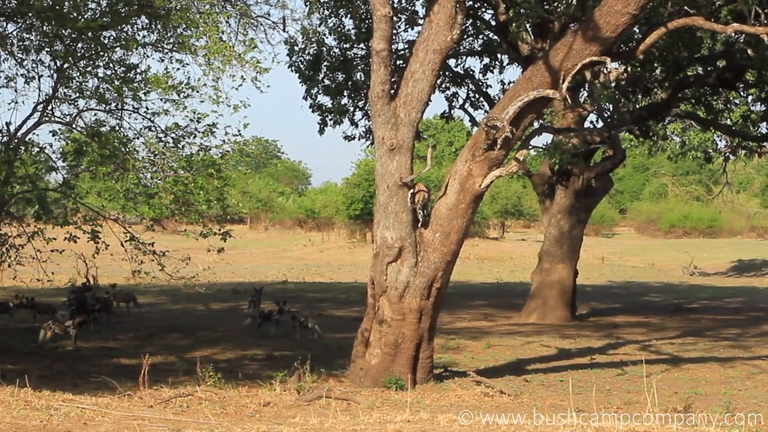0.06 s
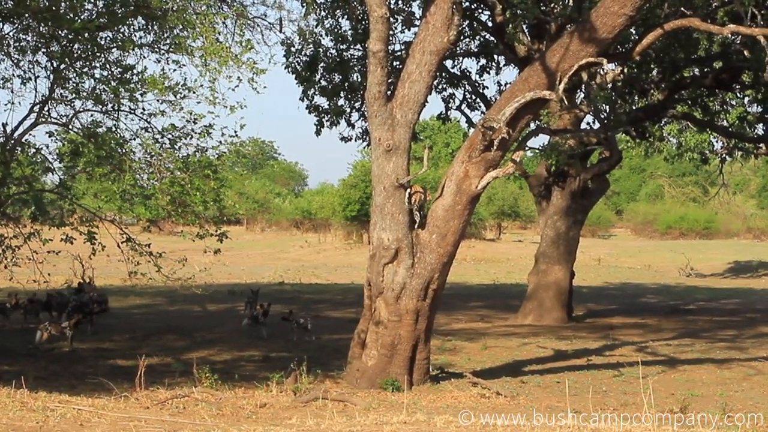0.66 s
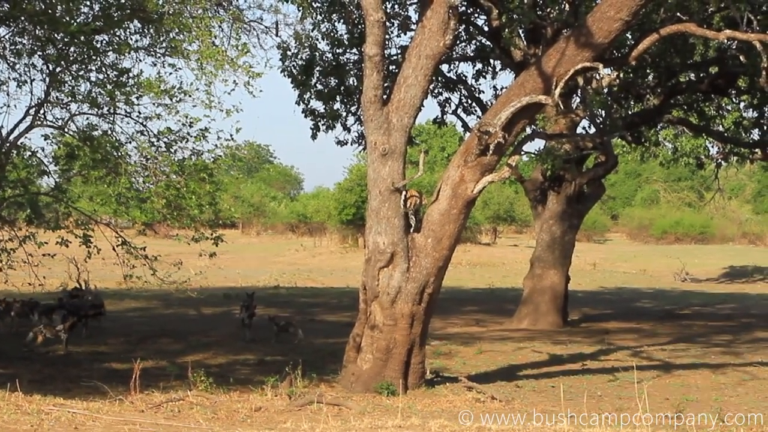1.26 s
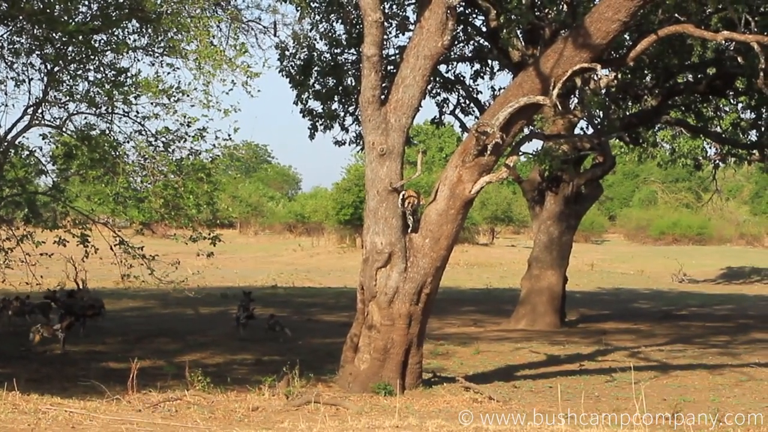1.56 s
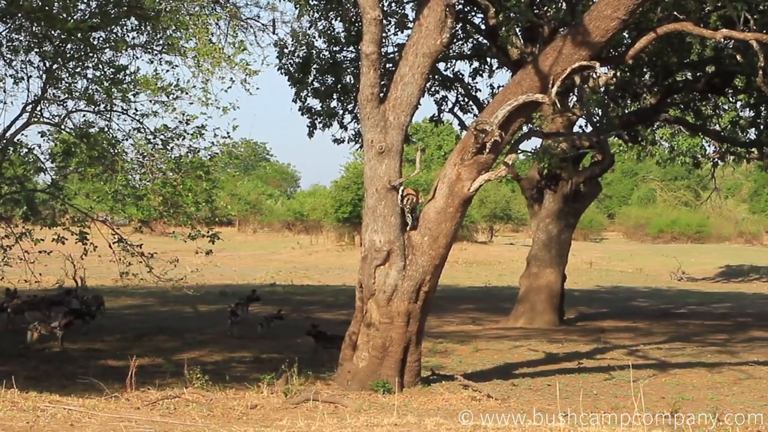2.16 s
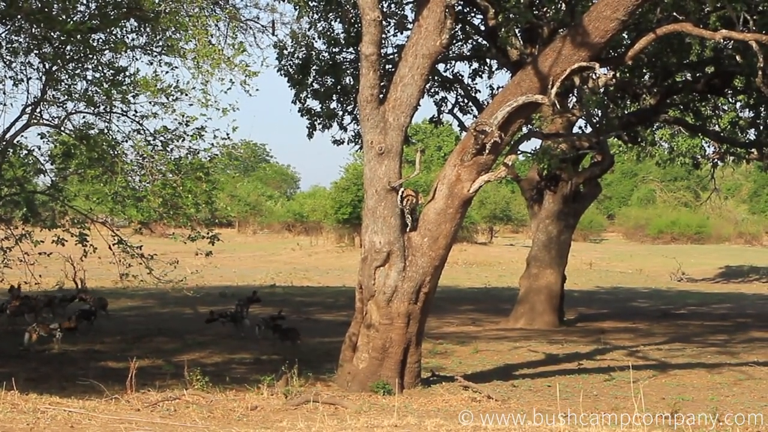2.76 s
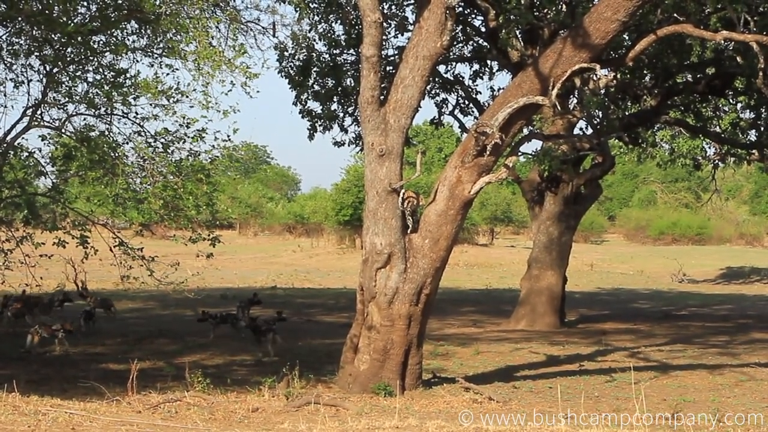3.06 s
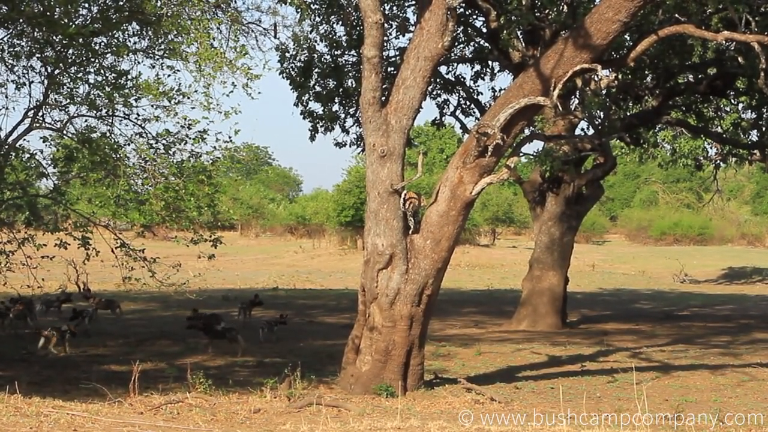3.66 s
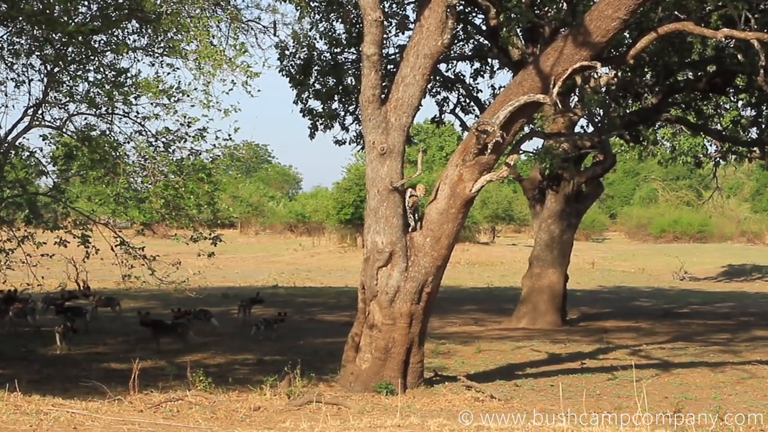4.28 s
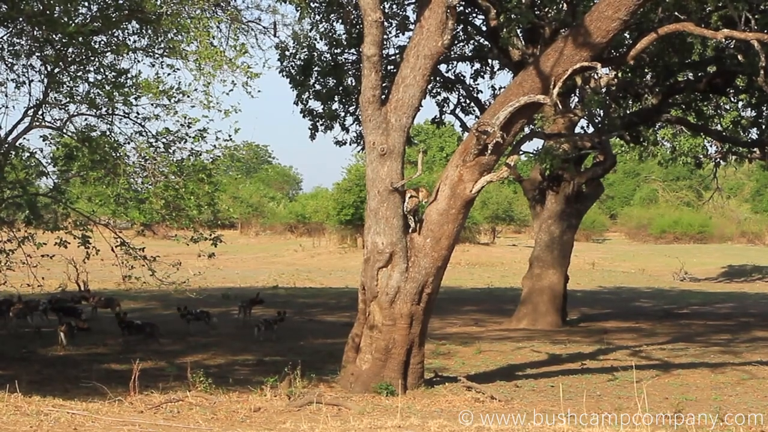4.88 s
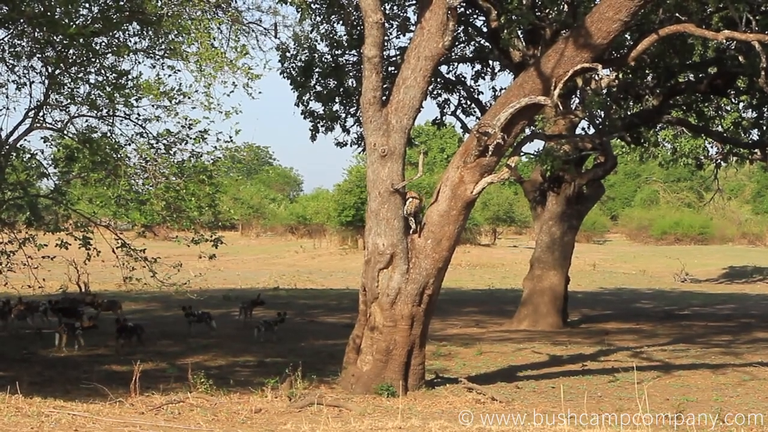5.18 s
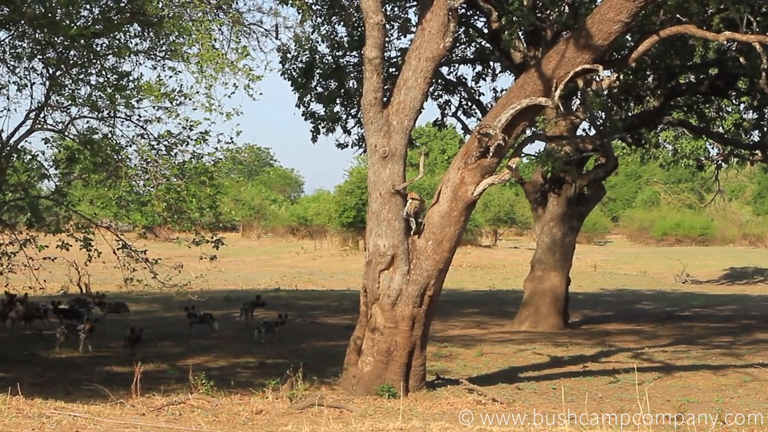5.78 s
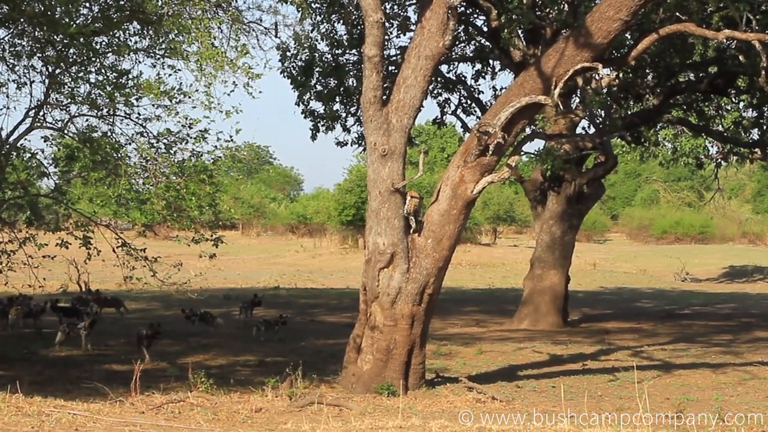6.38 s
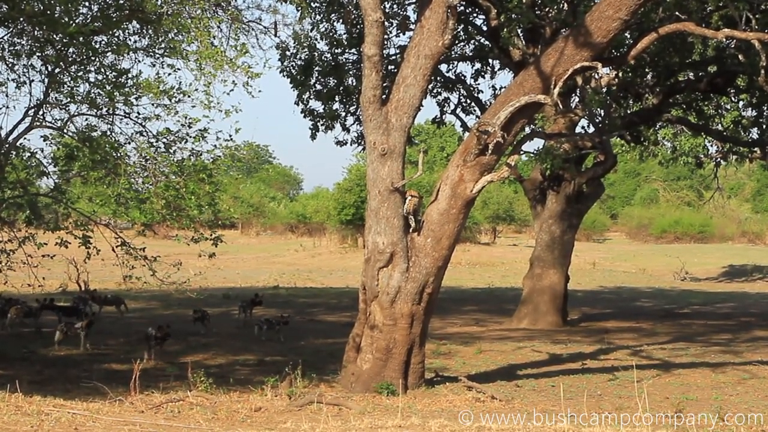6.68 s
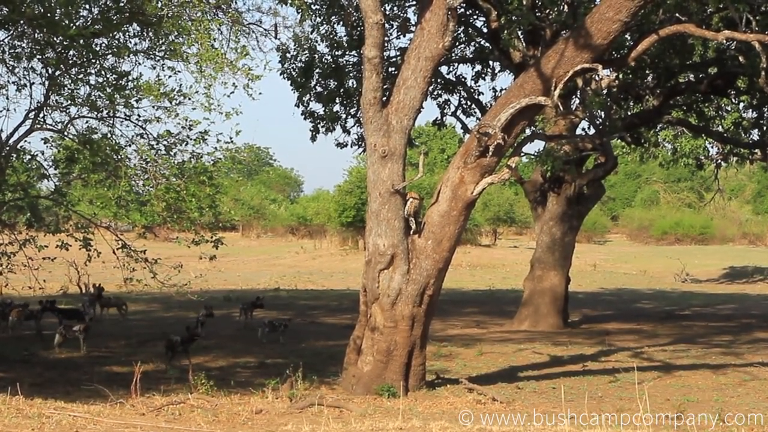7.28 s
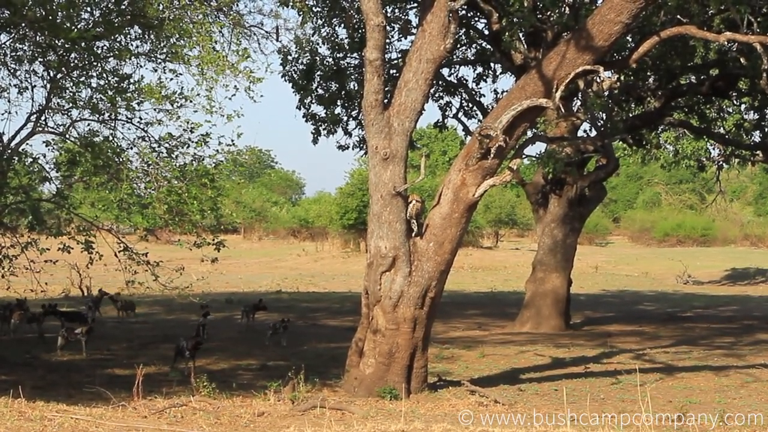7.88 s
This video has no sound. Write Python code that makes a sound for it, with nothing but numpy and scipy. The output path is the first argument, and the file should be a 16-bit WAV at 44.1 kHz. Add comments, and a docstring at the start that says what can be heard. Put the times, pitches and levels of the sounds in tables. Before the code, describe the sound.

A pack of wild dogs twitters on a dry, open plain. Four short, throaty yaps come first, each joined to a thin, very high warbling whistle. A lull follows, with faint squeaks and distant birds. Then the calls return louder, about two a second, mixed with tiny chirps, paws rustling in dry litter and soft clacks, ending on a creaky yap. Nearby trees add a short echo over quiet air and hissing leaves.

```python
"""A pack of wild dogs twitters in the shade of big trees on a dry plain.
Each call layers two voices: a short, throaty yap and a thin whistle that leaps, drops and warbles away.
Breathy rasp sits under the calls, squeaks and chirps answer them, and the last yap creaks.
Paws rustle in dry litter among soft clacks and one dull bump; trunks and foliage scatter the calls.
Far birds sing over a quiet bed of open air and hissing leaves."""
import sys
import numpy as np
from scipy import signal
from scipy.fft import rfft, irfft, next_fast_len
from scipy.io import wavfile
from scipy.ndimage import uniform_filter1d, map_coordinates

SR = 44100
rng = np.random.default_rng(int(sys.argv[2]) if len(sys.argv) > 2 else 0)


def file_out(sig):
    """Save sig as 16-bit WAV at sys.argv[1]."""
    # one column per channel
    cols = np.atleast_2d(sig).T
    # limit, then scale
    lim = np.clip(cols, -1, 1)
    pcm = np.round(lim * 32767).astype(np.int16)
    wavfile.write(sys.argv[1], SR, pcm)


N = 350154
TIME = np.arange(N) / SR

# Levels in the tables are relative: each layer's own gain and EQ come on top.
# high voice, one row a call:
# (dip pitch [Hz], top pitch [Hz], hold [s], lead-in level [dB], leap level [dB], hold level [dB])
WHISTLES = [(6110, 14700, .085, -33.5, -34, -38), (5930, 14800, 0.057, -38, -34, -34),
            (6700, 14400, 0.051, -56, -42, -41.5), (7800, 14400, .04, -50, -46.5, -42),
            (8800, 15000, .061, -39, -29, -19), (6500, 14400, .051, -24, -25, -17.5),
            (6820, 12400, .053, -31, -28, -23.5), (5740, 16300, 0.04, -20.5, -34, -20.5),
            (6440, 20000, .01, -27, -31, -24), (6210, 15200, 0.015, -28.5, -32, -36)]
# tail of each whistle: (length [s], period [s], climb time [s], depth [0-1], level [dB])
WARBLES = [(0.062, 0.024, .04, 0.7, -41), (0.1, 0.023, 0.03, 0.4, -46), (0.044, 0.04, .3, 0.49, -52.5),
           (0.066, 0.041, 0.076, 0.8, -47.5), (0.076, .03, 0.015, .3, -26), (.1, .0345, 0.016, .8, -25.5),
           (0.069, 0.045, 0.11, .25, -33), (.112, 0.019, 0.049, 0.7, -29), (0.1, 0.028, 0.012, .8, -30),
           (0.16, 0.026, 0.096, 0.7, -33)]
# low voice of the same calls: (time [s], length [s], start pitch [Hz], top pitch [Hz], end pitch [Hz],
# level [dB], overtone gain [dB], sag level [dB], rasp level [dB])
YAPS = [(0.123, 0.024, 1348, 1554, 1200, -38.5, 4.5, -48, -43.5),
        (0.567, .037, 1358, 1857, 1830, -29, -10.5, -44, -43),
        (1.036, .038, 1160, 1263, 1060, -43, -3, -48, -46.5),
        (1.422, 0.039, 1797, 1867, 1780, -40.5, -2, -77, -58),
        (5.229, 0.029, 1555, 1555, 1310, -30.5, 10.5, -63, -43),
        (5.711, 0.024, 1543, 1500, 1090, -27.5, 6.5, -65, -42.5),
        (6.192, .021, 1446, 1386, 1100, -33, 5.5, -49, -40.5),
        (6.652, .028, 1345, 1675, 1480, -21.5, -0.5, -46, -39.5),
        (7.124, 0.035, 1412, 1618, 1460, -23.5, 0.5, -33.5, -39.5),
        (7.593, 0.027, 1350, 1598, 1290, -26.5, 1, -44, -40.5)]
# throat resonances: (frequency [Hz], gain [dB])
THROAT_EQ = [(1100, 8.5), (1500, 0), (1900, -3), (2400, 2.5), (2900, -9), (3200, 1), (3700, -3),
             (4200, -9.5), (4700, -8.5), (5400, -11.5), (6300, -28.5), (11000, -38)]
# contour of the last, creaky yap: (time [s], pitch [Hz], level [dB])
CREAK_CONTOUR = [(7.772, 341.5, -52), (7.781, 362.6, -34), (7.79, 365, -32.5), (7.805, 356.5, -33.5),
                 (7.813, 355, -43)]
# its buzzy timbre: (harmonic [number], level [dB])
CREAK_PARTIALS = [(1, -23), (2, -15), (3, 2.5), (4, -13), (5, -7), (6, -0.5), (7, -9), (8, 2.5), (9, -1),
                  (10, -18), (11, -1.5), (12, -12), (14, -8)]
# colour of the throat noise: (frequency [Hz], gain [dB])
RASP_EQ = [(300, -46), (740, -12), (950, -7), (1350, 2.5), (1950, -3.5), (2900, 2), (4200, -10),
           (5800, -0.5), (7600, -16), (11000, -14.5), (16000, -22)]
# the pack's squeaks and whines:
# (time [s], length [s], start pitch [Hz], middle pitch [Hz], end pitch [Hz], level [dB])
SQUEAKS = [(.344, 0.018, 5660, 4410, 4600, -36.5), (1.56, 0.063, 10600, 12700, 8550, -50),
           (1.635, 0.046, 8400, 9800, 11300, -45), (1.69, 0.052, 11200, 10100, 6000, -47),
           (1.75, 0.045, 5400, 5130, 6000, -49.5), (1.9, 0.102, 777, 847, 750, -51),
           (1.985, 0.067, 10600, 13150, 12000, -49), (2.075, .06, 9200, 9520, 8800, -47.5),
           (2.5, 0.076, 11900, 11800, 12100, -52), (2.745, .017, 11000, 9100, 9100, -50.5),
           (2.9, 0.073, 6900, 6160, 5760, -60), (2.955, 0.026, 6100, 5430, 6300, -40),
           (4.255, .08, 11500, 14700, 13600, -58), (4.348, 0.025, 12500, 10100, 9000, -53.5),
           (5.082, .024, 9700, 13400, 15300, -49), (5.984, 0.016, 6160, 5520, 5800, -37.5),
           (5.995, .042, 9300, 9100, 8700, -53), (7.757, 0.011, 5300, 5680, 5800, -20)]
# spells of thin chirping: (start [s], end [s], level [dB])
CHATTER_SPELLS = [(0.702, .98, -70), (3.002, 3.2, -63), (3.868, 4.026, -59), (5.427, 5.66, -53),
                  (6.043, 6.17, -52), (6.405, 6.595, -51), (6.976, 7.11, -50), (7.414, 7.52, -58)]
# foreground clacks: (time [s], level [dB], hollow knock gain [dB])
CLACKS = [(4.972, -32.5, -1), (5.134, -36, -6), (5.465, -23, -5), (5.495, -28, 3), (5.603, -32.5, -22),
          (6.414, -24.5, 0.5), (6.447, -23, -30), (6.886, -29.5, -2.5), (6.918, -28.5, -3.5),
          (7.363, -33.5, 0.5), (7.392, -31, -21)]
# colour of a clack's snap: (frequency [Hz], gain [dB])
SNAP_EQ = [(200, -5), (1000, -12.5), (1700, -19), (2800, 0), (4300, -10.5), (6000, -16), (15000, -35)]
# spells of paws in litter: (start [s], end [s], level [dB])
SCUFFLE_SPELLS = [(0.798, 0.988, -53), (4.752, 5.227, -63.5), (5.439, 5.668, -51.5), (5.931, 6.157, -53.5),
                  (6.393, 6.62, -54), (6.863, 7.11, -53.5), (7.339, 7.517, -53)]
# colour of the dry litter: (frequency [Hz], gain [dB])
LITTER_EQ = [(80, -16), (200, -3), (290, 13.5), (430, -5.5), (760, 4.5), (1100, -1), (1700, -0.5),
             (3000, 1.5), (4500, -5), (6500, -20.5), (15000, -40)]
# reverb send as the dogs turn: (time [s], gain [dB])
TREE_SEND = [(0, -1.5), (1.1, -0.5), (1.6, 3.5), (2.2, -7), (5.8, -11.5), (6.3, -8.5), (7.65, -7),
             (7.8, -6)]
# reverb decay among the trees: (frequency [Hz], t60 [s])
TREE_DECAY = [(300, 0.26), (1500, 0.46), (3000, 0.25), (6000, 0.39), (10000, 0.35), (15000, 0.086)]
# clear notes of far birds:
# (time [s], length [s], start pitch [Hz], middle pitch [Hz], end pitch [Hz], level [dB])
BIRD_NOTES = [(.42, 0.08, 2870, 2530, 2390, -53), (.49, 0.076, 6530, 6100, 5940, -56),
              (.79, 0.063, 3830, 3500, 3140, -51), (1.24, .053, 2350, 2470, 2100, -54),
              (1.27, 0.069, 6470, 6300, 6000, -54.5), (2.25, .03, 2200, 2770, 3130, -49.5),
              (2.51, 0.039, 6400, 6200, 6260, -49.5), (2.595, 0.035, 2020, 2550, 2900, -53.5),
              (2.605, 0.03, 5880, 5600, 5670, -49.5), (2.865, 0.072, 2160, 2480, 2260, -50.5),
              (3.225, 0.04, 2210, 2730, 2870, -55.5), (3.43, 0.063, 2440, 2270, 2140, -58),
              (3.45, 0.067, 8000, 7160, 6640, -58), (3.535, 0.07, 2150, 2160, 1790, -56.5),
              (3.695, .037, 1820, 2440, 1890, -54.5), (3.738, .055, 1790, 1565, 1900, -60),
              (3.79, 0.0274, 2370, 2630, 2940, -56), (5.635, 0.047, 6070, 5900, 5950, -51),
              (6.98, 0.065, 3220, 2600, 2260, -47)]
# a far bird's sinking trills: (start [s], end [s], first pitch [Hz], last pitch [Hz], level [dB])
BIRD_TRILLS = [(0.277, .52, 3230, 2950, -52), (0.857, 1.985, 3220, 2353, -55.5)]
# fader moves of the ambience: (time [s], murmur level [dB], hiss level [dB])
AIR_LEVELS = [(0, -59, -57), (1, -60, -59), (2.2, -62, -60.5), (4.8, -62, -61.5), (5.4, -61.5, -56.5),
              (7.2, -60, -59.5), (7.94, -56.5, -54.5)]
# colour of the air's murmur: (frequency [Hz], gain [dB])
MURMUR_EQ = [(12, -46), (22, -25), (40, -6.5), (70, -2.5), (160, -.5), (290, 0), (430, -2.5), (600, -4.5),
             (1200, -10), (2500, -12), (5500, -38)]
# colour of the leaves' hiss: (frequency [Hz], gain [dB])
LEAF_EQ = [(300, -7), (900, 4), (2200, 3.5), (4000, 2), (8000, -2.5), (13000, -5), (16000, -9.5)]

HELD_HZ, CEILING_HZ = 5260, 9170  # the whistle lands on the first; its warble climbs towards the second


def whistles(jitter=0.0089, strain=0.0336, waver=0.00914, flutter_db=3, octave_db=-15):
    """The dogs' high voice: a thin, fluttering tone that turns ragged at the top of its range."""
    out = np.zeros(N)
    for (start, length, *_), whistle, tail in zip(YAPS, WHISTLES, WARBLES):
        onset, gate, hz, db = gesture(whistle_contour(start, start + length, whistle, tail))
        height = np.clip((hz - 9000) / 5000, 0, 1)
        shake = (jitter + strain * height) * wobble(1104, len(hz)) + waver * wobble(157.6, len(hz))
        phase = phase_of(hz * (1 + shake))
        tone = np.sin(phase) + amp(octave_db) * np.sin(2 * phase) * (2 * hz < SR / 2)
        flutter = np.minimum(flutter_db * wobble(417, len(hz)), flutter_db)
        add(out, onset, gate * amp(db + flutter) * tone)
    return out


def whistle_contour(start, end, whistle, tail, lead_s=0.017, lead_hz=7290, leap_s=0.008, drop_s=0.0058):
    """Breakpoints (time, pitch, level): dip before the yap, leap during it, land, hold and warble."""
    dip_hz, top_hz, hold_s, lead_db, leap_db, hold_db = whistle
    sink_s, fade_db_per_s = 0.307 * hold_s, 340
    lead_in = [(start - lead_s, lead_hz, lead_db - 18),
               (start - 2 * lead_s / 3, dip_hz, lead_db),
               (start - lead_s / 3, dip_hz, lead_db - 4.5)]
    leap = [(start, 0.7 * top_hz, leap_db),
            (start + leap_s, 0.95 * top_hz, leap_db - 4.5),
            (end - drop_s / 2, top_hz, leap_db)]
    drop = [(end + drop_s / 4, CEILING_HZ, leap_db - 1.8),
            (end + 2 * drop_s / 3, dip_hz, leap_db - 6)]
    held = [(end + drop_s, HELD_HZ, hold_db),
            (end + drop_s + sink_s, 0.93 * HELD_HZ, hold_db - fade_db_per_s * sink_s)]
    return [*lead_in, *leap, *drop, *held, *warble(end + hold_s, *tail)]


def warble(start, length, period, climb_s, depth, db, rise_db=-6.5, fall_db=-12.5, db_per_octave=-10):
    """Breakpoints of a pitch that climbs and keeps dipping back, thinning on glides and with height."""
    t = np.linspace(0, length, 200)
    swing = np.pi * t / period
    reach = np.minimum(t / climb_s, 1) * (1 - depth * np.cos(swing) ** 2)
    hz = (HELD_HZ + (CEILING_HZ - HELD_HZ) * reach) * (1 + 0.0126 * wobble(SR / 20, len(t)))
    slope = np.sin(2 * swing)
    glide_db = np.where(slope > 0, rise_db, fall_db) * slope ** 2
    return np.transpose([start + t, hz, db + glide_db + db_per_octave * np.log2(hz / HELD_HZ)])


def yaps(attack_s=0.004, edge_db=-6.5, jitter=0.0052, rough=0.2, flutter_db=2,
         sag_s=0.01916, sag_hz=(980, 760, 790)):
    """The low voice: harmonics bend through the throat's resonances, then sag into a rough low note."""
    out, sags = np.zeros(N), []
    crest, close = 0.546, 0.665  # shares of the yap where the pitch levels off and gives way
    for start, length, start_hz, top_hz, end_hz, level_db, overtone_db, sag_db, _ in YAPS:
        end = start + length
        envelope = [(start, edge_db), (start + attack_s, 0), (start + close * length, 0), (end, edge_db)]
        onset, gate, db = gesture(envelope)
        progress = np.linspace(0, 1, len(db))
        hz = np.interp(progress, [0, crest, close, 1], [start_hz, top_hz, top_hz, end_hz])
        shake = (jitter + rough * progress ** 6) * wobble(830, len(hz))
        phase = phase_of(hz * (1 + shake))
        voice = np.zeros(len(hz))
        for k in range(1, 8):
            partial_db = along(THROAT_EQ, k * hz) + overtone_db * (k > 1)
            voice += amp(partial_db + flutter_db * wobble(252, len(hz))) * np.cos(k * phase)
        add(out, onset, -gate * amp(level_db + db) * voice)
        sags.append((end - sag_s / 4, sag_s, *sag_hz, sag_db))
    return out + notes(sags, jitter=0.033, flutter_db=4.5)


def creak(jitter=0.021, gain_db=-1):
    """The vocal folds repeat only every third swing, so the last yap is low and buzzy."""
    out = np.zeros(N)
    onset, gate, hz, db = gesture(CREAK_CONTOUR)
    phase = phase_of(hz * (1 + jitter * wobble(670, len(hz))))
    buzz = sum(amp(level) * np.cos(k * phase) for k, level in CREAK_PARTIALS)
    add(out, onset, -gate * amp(db + gain_db) * buzz)
    return out


def rasp(gain_db=3, grain_db=2, attack_s=0.033, fade_db_per_s=44, release_s=0.09):
    """Grainy throat noise that swells with the yap and fades beneath the whistle."""
    envelope = np.zeros(N)
    breath = unit(noise(RASP_EQ) * amp(grain_db * wobble(300)))
    for (start, length, *_, db), (_, _, hold_s, *_), (tail_s, *_) in zip(YAPS, WHISTLES, WARBLES):
        span = length + hold_s + tail_s
        faded_db = db - fade_db_per_s * span
        onset, gate, level = gesture([(start, db - 20), (start + attack_s, db), (start + span, faded_db),
                                      (start + span + release_s, faded_db - 15)])
        add(envelope, onset, gate * amp(level))
    return amp(gain_db) * envelope * breath


def squeaks():
    """The pack's stray squeaks and whines, each a single bending tone."""
    return notes(SQUEAKS, jitter=0.014, flutter_db=3)


def chatter(gap_s=0.037, length_s=0.0165, low_hz=9100, rise=1.1):
    """Other dogs add runs of tiny rising chirps."""
    rows = []
    for start, end, db in CHATTER_SPELLS:
        for onset in np.arange(start, end, gap_s):
            late, pitch, accent = rng.standard_normal(3)
            hz = low_hz * np.exp(0.1 * abs(pitch) + 0.04 * pitch)
            rows.append((onset + 0.0044 * late, length_s, hz, hz * rise ** 0.3, hz * rise,
                         db + 3 * accent))
    return notes(rows, jitter=0.0056, flutter_db=4)


def clacks(knock_hz=1030, knock_t60=0.037, body_hz=290, body_t60=0.11):
    """Dry clacks in three layers: a tiny snap, a brief hollow knock and a dull body."""
    out, t = np.zeros(N), np.arange(SR // 16) / SR
    for onset, db, hollow_db in CLACKS + faint_clacks():
        snap_t60 = np.interp(db, [-36, -25], [0.009, 0.01])  # louder hits last slightly longer
        snap = amp(-2 - 60 * t / snap_t60) * noise(SNAP_EQ, len(t))
        knock = ring(t, knock_hz * (1 + 0.034 * rng.normal()), hollow_db - 7, knock_t60)
        body = ring(t, body_hz, -28, body_t60)
        attack = 1 - np.exp(-t / (0.037 * snap_t60))
        add(out, onset + 0.0005, amp(db) * attack * (snap + knock + body))
    return out


def faint_clacks(gap_s=0.044, scatter_s=0.012, lift_db=17, spread_db=1.5, hollow_db=-19):
    """Cues for small clacks strewn through each spell of scuffling."""
    rows = []
    for start, end, db in SCUFFLE_SPELLS:
        for onset in np.arange(start + gap_s / 2, end, gap_s):
            late, accent = rng.standard_normal(2)
            rows.append((onset + scatter_s * late, db + lift_db + spread_db * accent, hollow_db))
    return rows


def scuffles(grain_db=5):
    """Paws shift in dry litter: a low rustle that comes in small uneven crackles."""
    out = np.zeros(N)
    for start, end, db in SCUFFLE_SPELLS:
        size = int((end - start) * SR)
        rustle = noise(LITTER_EQ, size)
        crackle = amp(grain_db * np.minimum(wobble(260, size), 1.5))
        add(out, start, amp(db) * arch(size) * unit(rustle * crackle))
    return out


def thump(onset=4.512):
    """One dull, faint bump: a low sine that dies quickly."""
    out, t = np.zeros(N), np.arange(SR // 5) / SR
    add(out, onset, ring(t, hz=85, db=-49, t60=0.11))
    return out


def tree_reverb(send, attack_s=0.0027, lump_db=4, near_db=5, near_s=0.21):
    """Near trunks throw back strong early echoes; far foliage leaves a weaker, lumpy tail."""
    out, hop = np.zeros(N), SR // 4
    for centre in range(0, N, hop):  # crossfade into a fresh tail every hop
        hz, t, spectrum = signal.stft(rng.standard_normal(SR * 3 // 4), SR, nperseg=256)
        decay = amp(-60 * t / along(TREE_DECAY, hz)[:, None])
        tail = signal.istft(spectrum * decay, SR, nperseg=256)[1]
        age = np.arange(len(tail)) / SR
        tail *= 1 - np.exp(-age / attack_s)
        tail *= amp(near_db * np.exp(-age / near_s) + lump_db * wobble(250, len(tail)))
        crossfade = np.clip(1 - abs(np.arange(N) - centre) / hop, 0, 1)
        first = max(centre - hop, 0)
        piece = (send * crossfade)[first:centre + hop]
        add(out, first / SR, signal.fftconvolve(piece, tail / np.linalg.norm(tail)))
    return out


def far_birds():
    """Distant song: trills and faint filler around a few clear, whistled notes."""
    return trills() + faint_song() + notes(BIRD_NOTES, jitter=0.016, flutter_db=2.5)


def trills(gap_s=0.034, length_s=0.045, detune=0.0184, bend=0.024):
    """A far bird runs down the scale in short, blurred notes."""
    rows = []
    for start, end, first_hz, last_hz, db in BIRD_TRILLS:
        for onset in np.arange(start, end - gap_s, gap_s):
            pitch, softer_db = rng.standard_normal(2)
            hz = np.interp(onset, [start, end], [first_hz, last_hz]) * (1 + detune * pitch)
            rows.append((onset, length_s, hz * (1 + bend), hz, hz * (1 - bend), db - softer_db))
    return notes(rows, jitter=0.024, flutter_db=3.5)


def faint_song(start=2.3, end=4.4, gap_s=0.12, length_s=0.061, centre_hz=2400, spread=0.087, db=-63):
    """Fainter bird notes wander between the clear ones."""
    rows = []
    for onset in np.arange(start, end, gap_s):
        late_s = gap_s * rng.normal() / 4
        pitches = centre_hz * np.exp(spread * rng.standard_normal(3))
        rows.append((onset + late_s, length_s, *pitches, db))
    return notes(rows, jitter=0.026, flutter_db=0.5)


def air(murmur_gain_db=2, drift_db=1.5):
    """The bed: a low, slowly moving murmur of open air under a faint, even hiss of leaves."""
    murmur_db, hiss_db = automation(AIR_LEVELS)
    murmur = amp(murmur_db + murmur_gain_db + drift_db * wobble(4.675)) * noise(MURMUR_EQ)
    return murmur + amp(hiss_db) * noise(LEAF_EQ)


def notes(rows, jitter, flutter_db):
    """Pure tones that swell and fade while they bend through three pitches."""
    out = np.zeros(N)
    for onset, length, *pitches, db in rows:
        size = int(length * SR)
        bend = np.polyfit([0, 0.5, 1], pitches, 2)
        hz = np.polyval(bend, np.linspace(0, 1, size)) * (1 + jitter * wobble(354, size))
        swell = arch(size) * amp(db + flutter_db * wobble(81, size))
        add(out, onset, swell * np.sin(phase_of(hz)))
    return out


def gesture(breakpoints, pad_s=0.002, fade_s=0.004):
    """Onset, soft gate and smoothed control curves of one short call."""
    times, *columns = np.transpose(breakpoints)
    times = np.sort(times)
    t = np.arange(times[0] - pad_s, times[-1] + pad_s, 1 / SR)
    to_edge_s = np.minimum(t - t[0], t[-1] - t)
    gate = np.sin(np.pi / 2 * np.clip(to_edge_s / fade_s, 0, 1)) ** 2
    curves = [uniform_filter1d(np.interp(t, times, c), size=110, mode="nearest") for c in columns]
    return t[0], gate, *curves


def automation(breakpoints):
    """One scene-long curve for each column after the time."""
    times, *columns = np.transpose(breakpoints)
    return [np.interp(TIME, times, c) for c in columns]


def ring(t, hz, db, t60):
    """A sine that falls 60 dB in t60 seconds."""
    return amp(db - 60 * t / t60) * np.sin(2 * np.pi * hz * t)


def arch(size):
    """A rounded swell and fade."""
    return np.sqrt(abs(np.sin(np.pi * np.linspace(0, 1, size))))


def phase_of(hz):
    """Oscillator phase for a moving pitch."""
    return 2 * np.pi * np.cumsum(hz) / SR


def wobble(rate, size=N):
    """Smooth random modulation, rate knots a second."""
    knots = rng.standard_normal(int(size * rate / SR) + 4)
    return map_coordinates(knots, [np.arange(size) * rate / SR])


def noise(eq, size=N):
    """Coloured noise of rms 1."""
    return unit(filtered(rng.standard_normal(size), lambda hz: amp(along(eq, hz))))


def filtered(x, response):
    """Zero-phase EQ; response gives the gain at each frequency."""
    padded = next_fast_len(len(x) + 8192)
    return irfft(rfft(x, padded) * response(np.fft.rfftfreq(padded, 1 / SR)), padded)[:len(x)]


def along(points, hz):
    """Read (frequency, value) points on a log axis."""
    frequencies, values = np.transpose(points)
    return np.interp(np.log(hz + 1), np.log(frequencies + 1), values)


def add(track, onset, x):
    """Mix x into the track at onset seconds."""
    part = track[max(round(onset * SR), 0):][:len(x)]
    part += x[:len(part)]


def amp(db):
    """Decibels to gain."""
    return 10 ** (np.asarray(db) / 20)


def unit(x):
    """x at rms 1."""
    return x / np.sqrt(np.mean(x ** 2) + 1e-20)


def scene(squeak_db=-1, chatter_db=-3, shelf_db=-4, bird_db=-3, bird_send_db=-6):
    """The mono mix: dogs in front, tree reverb around them, birds and air behind."""
    pack = amp(squeak_db) * squeaks() + amp(chatter_db) * chatter()
    whistle = whistles()
    others = yaps() + creak() + pack + clacks()
    birds = far_birds()
    send_db = automation(TREE_SEND)[0]
    # a dog that faces away aims its whistle into the trees: less direct sound, more echo
    turned_db = 0.2 * np.maximum(send_db + 12.5, 0)
    treble_shelf = [(7000, 0), (14000, shelf_db)]
    direct = filtered(whistle * amp(-turned_db) + others, lambda hz: amp(along(treble_shelf, hz)))
    dog_send = (whistle * amp(turned_db / 2) + others) * amp(send_db)
    echo = tree_reverb(dog_send + amp(bird_send_db) * birds)
    return (direct + amp(bird_db) * birds + rasp() + scuffles() + echo + thump() + air())[None]


def record(dry, cutoff_hz=15900):
    """A brick-wall low-pass takes the very top off the mix."""
    return filtered(dry[0], lambda hz: hz < cutoff_hz)[None]


dry = scene()
out = record(dry)
file_out(out)
```